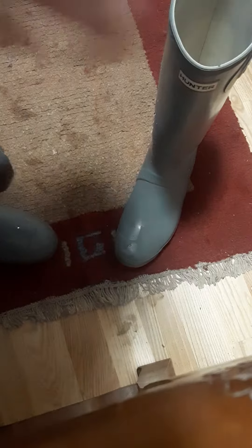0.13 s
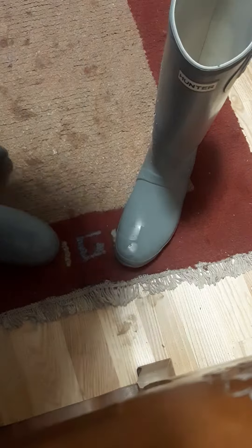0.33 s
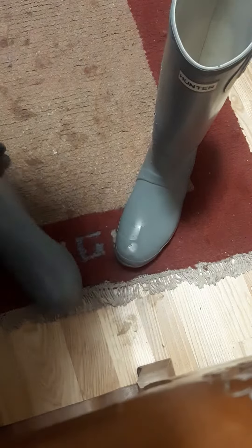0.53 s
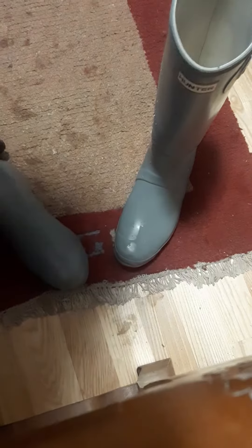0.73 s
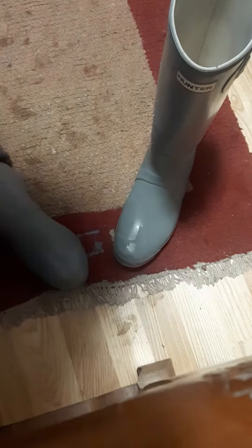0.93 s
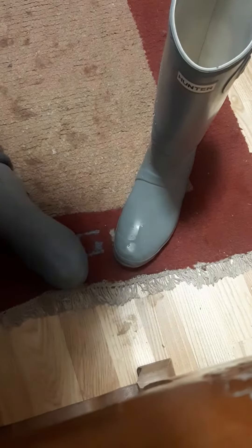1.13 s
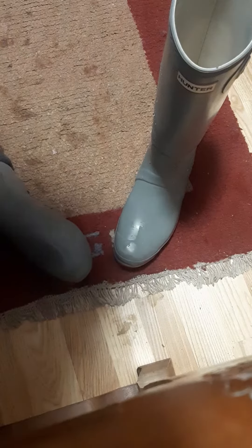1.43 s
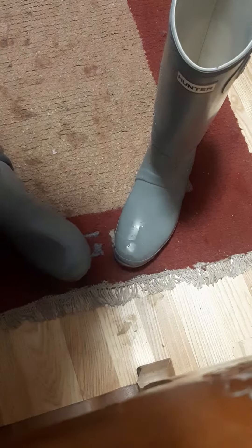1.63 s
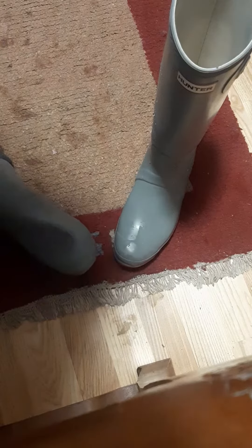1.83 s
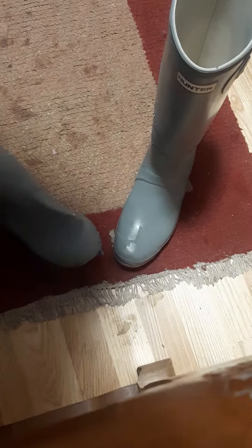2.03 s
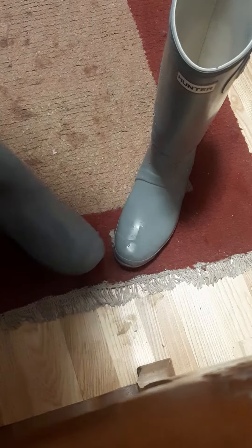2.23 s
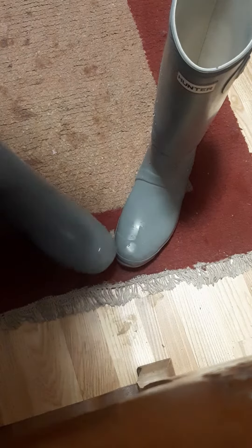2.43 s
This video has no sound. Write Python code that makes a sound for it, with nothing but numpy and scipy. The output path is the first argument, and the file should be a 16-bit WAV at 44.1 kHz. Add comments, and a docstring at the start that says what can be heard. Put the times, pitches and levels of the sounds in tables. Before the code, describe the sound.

Close stereo pickup in a small room of rubber boots being moved: an early hollow rubbery snap, a run of low creaking ticks, two muffled knocks, and fibrous rubbing on the rug towards the end.

```python
"""Rubber boots shift on a rug over a wooden floor in a small room, heard through two microphone ports.
They slide softly as dense tiny slips: hissing rug fibres over a low rub. Rubber scuffs are swelling strokes
of the same friction, and the boot shaft slips from the hand in a squeaky run of impulses that leaves it ringing.
A boot creaks in five slips as it takes weight, and its sole knocks down twice among faint touches:
coloured impulses that ring the floor and return from nearby walls. Quiet room tone lies under it all."""
import sys
import numpy as np
from scipy import signal
from scipy.fft import rfft, irfft
from scipy.io import wavfile
from scipy.ndimage import uniform_filter1d

SR = 44100
rng = np.random.default_rng(int(sys.argv[2]) if len(sys.argv) > 2 else 0)


def store_pcm(level_fs):
    """Save levels as 16-bit WAV."""
    pcm = np.round(np.clip(level_fs, -1, 1) * 32767).astype(np.int16)
    wavfile.write(sys.argv[1], SR, np.atleast_2d(pcm).T)


N = 114660
T = np.arange(N) / SR


def from_db(db):
    """Decibels to gain."""
    return 10 ** (np.asarray(db) / 20)


def rms_one(x):
    """Scale to unit rms."""
    return x / np.sqrt(np.mean(x ** 2) + 1e-20)


def through(x, response):
    """Convolve with an impulse response, channel by channel."""
    return signal.fftconvolve(np.atleast_2d(x), np.atleast_2d(response), axes=1)[:, :N]


def colour(x, points, tilt_db=0, size=4096):
    """Causal (minimum-phase) equaliser through (f/Hz, level/dB) points, tilted in dB per octave about 1 kHz."""
    hz, db = np.transpose(points)
    f = np.maximum(np.arange(size // 2 + 1) * SR / size, 10)
    level_db = np.interp(np.log(f), np.log(hz), db) + tilt_db * np.log2(f / 1000)
    cepstrum = irfft(np.log(from_db(level_db)))
    # folding the cepstrum onto positive time makes the filter causal
    cepstrum[1:size // 2] *= 2
    cepstrum[size // 2 + 1:] = 0
    return through(x, irfft(np.exp(rfft(cepstrum))))


def pan(db):
    """Left and right gains; a positive level difference favours the left port."""
    return from_db([[db / 2], [-db / 2]])


def clicks(rows):
    """One impulse for each (t/s, level/dB) row."""
    out = np.zeros(N)
    for start, db in rows:
        out[int(start * SR)] += from_db(db)
    return out


def ring(x, modes):
    """Excite damped sines of alternating sign, one for each (f/Hz, level/dB, t60/s) row."""
    t = T[:SR]
    response = np.zeros(SR)
    for k, (hz, db, t60) in enumerate(modes):
        decay = from_db(db - 60 * t / t60)
        response += (-1) ** k * decay * np.sin(2 * np.pi * hz * t)
    return through(x, response)


def share_bass(pair):
    """Long waves reach both ports alike; above about 324 Hz the ports drift apart."""
    f = np.arange(N // 2 + 1) * SR / N
    apart = f ** 2 / (f ** 2 + 324 ** 2)
    mid, side = rfft(pair)
    return irfft(mid * np.sqrt(1 - apart / 2) + side * np.sqrt(apart / 2) * [[1], [-1]], N)


def friction(per_s, spread_db):
    """Dense tiny slips of random sign and uneven size, at random times."""
    excess = np.minimum(rng.exponential(1, (2, N)), 4)
    sizes = from_db(spread_db * excess) * rng.choice([-1, 1], (2, N))
    return share_bass(sizes * (rng.random((2, N)) < per_s / SR))


def room_tail():
    """Diffuse reverberation: builds up, drops fast, then lingers; even in colour, unit energy."""
    build_s, early_t60_s, late_t60_s, late_db = 0.01, 0.24, 0.34, 2
    build = np.minimum(T / build_s, 1) ** 2
    decay = from_db(-60 * T / early_t60_s) + from_db(late_db - 60 * T / late_t60_s)
    spectrum = rfft(share_bass(rng.standard_normal((2, N))) * build * decay)
    smooth_size = np.sqrt(uniform_filter1d(abs(spectrum) ** 2, size=300, axis=1))
    return irfft(spectrum / smooth_size, N)[:, :SR]


def placed(x, tail, pan_db, room_db):
    """Direct sound, later at the right port, plus reverberation."""
    port_lag_s = 0.00027
    direct = np.array([x, np.interp(T - port_lag_s, T, x)])
    return direct * pan(pan_db) + from_db(room_db) * through(x, tail)


# colour of the quiet room: [f/Hz, relative level/dB]
AIR_COLOUR = [(25, 10.5), (100, 6), (200, -4), (700, -5.5), (1400, -54.5), (2500, -5.5), (4000, -30.5),
              (7000, -2.5), (9000, -42), (15000, -23.5)]


def room_tone():
    """Still air in the room: steady coloured noise with its bass shared by both ports."""
    noise = share_bass(rng.standard_normal((2, N)))
    return from_db(-68.5) * rms_one(colour(noise, AIR_COLOUR))


# boot sliding over the rug: [t/s, hiss level/dB, low rub level/dB]
SLIDE_LEVELS = [(0, -75.5, -69), (.1, -76.5, -73), (.21, -63.5, -72.5), (.295, -67, -46.5), (.36, -65, -59),
                (.46, -67.5, -64), (.55, -70.5, -81), (.615, -65, -89), (.71, -59, -71.5),
                (0.822, -72, -73), (.9, -66, -64.5), (1.2, -69, -68.5), (1.4, -67, -68), (1.58, -68, -71.5),
                (1.86, -61.5, -62.5), (1.948, -56.5, -55.5), (2.05, -56, -56), (2.15, -64, -61.5),
                (2.3, -59, -61.5), (2.59, -55.5, -58)]
# colour of the rug fibres: [f/Hz, relative level/dB]
HISS_COLOUR = [(300, -38), (1200, -10), (2400, -4), (3500, 0), (7000, -2.5), (8800, -9.5), (12000, -6),
               (15500, -13)]
# colour of the low rub: [f/Hz, relative level/dB]
RUB_COLOUR = [(40, -28), (105, -18), (150, -7), (215, -4.5), (290, -3), (380, 0), (520, -0.5), (700, -0.5),
              (1300, -9), (3000, -13.5), (8000, -64.5)]


def slide():
    """Rug fibres hiss under the moving boot, over a low uneven rub."""
    slips_per_s, spread_db, flutter_db = 9000, 1.5, 0.23
    t, hiss_db, rub_db = np.transpose(SLIDE_LEVELS)
    flutter = flutter_db * rms_one(uniform_filter1d(rng.standard_normal(N), size=900))
    hiss = rms_one(colour(friction(slips_per_s, spread_db), HISS_COLOUR))
    rub = rms_one(colour(friction(slips_per_s, spread_db), RUB_COLOUR))
    hiss = hiss * from_db(np.interp(T, t, hiss_db) + flutter / 2)  # the hiss flutters half as much
    rub = rub * from_db(np.interp(T, t, rub_db) + flutter)
    return hiss * pan(6) + rub * pan(5)


# rubber strokes: [start t/s, attack/s, release t60/s, level/dB, treble tilt/(dB per octave),
# squeak level relative to the rubbing/dB]
SCUFF_STROKES = [(.11, 0.105, 0.051, -62.5, -1, 4.5), (0.2114, 0.0073, 0.078, -35, 0, -19),
                 (.226, .015, 0.19, -31, -0.17, -46), (0.681, 0.039, 0.18, -49.5, 1, -11)]
# colour of rubbing rubber: [f/Hz, relative level/dB]
RUBBER_COLOUR = [(50, -13.5), (130, -1), (220, 1.5), (380, -3), (550, 1.5), (800, 0), (1200, -2),
                 (2200, -8), (3500, -5), (5500, -6), (7300, -10), (8800, -20.5), (11000, -19.5),
                 (14000, -20)]
# resonances of the hollow shaft, also set off by its snap: [f/Hz, relative level/dB, t60/s]
SHAFT_RESONANCES = [(215, -59, .3), (317, -56, .28), (445, -53, .36), (535, -54, .34), (592, -52, .32),
                    (848, -55, .2), (1554, -54, .2), (1708, -52, .22), (2052, -54, .22), (2218, -60, .22),
                    (2319, -58, .22), (2648, -56, .22), (2903, -55, .22), (3050, -58, .22)]


def scuffs(tail):
    """Rubber drags in strokes that swell and die, with a hoarse squeak; the hollow shaft rings along."""
    grips_per_s, grip_spread_db = 3500, 1
    squeak_hz, squeak_width_hz = 2410, 980
    edges_hz = [squeak_hz - squeak_width_hz / 2, squeak_hz + squeak_width_hz / 2]
    squeak_band = signal.butter(2, edges_hz, "band", fs=SR, output="sos")
    strokes = np.zeros((2, N))
    for start, attack, release, db, tilt_db, squeak_db in SCUFF_STROKES:
        swell = np.clip((T - start) / attack, 0, 1)
        decay = from_db(-60 * np.maximum(T - start - attack, 0) / release)
        grips = friction(grips_per_s, grip_spread_db)
        rubbing = rms_one(colour(grips, RUBBER_COLOUR, tilt_db))
        squeak = rms_one(signal.sosfilt(squeak_band, grips))
        strokes += from_db(db) * swell * decay * rms_one(rubbing + from_db(squeak_db) * squeak)
    ringing = from_db(0.5) * ring(strokes, SHAFT_RESONANCES)
    return strokes * pan(2) + ringing + from_db(-5.5) * through(strokes, tail)


# slips as the shaft snaps free: [t/s, relative level/dB]
SNAP_SLIPS = [(.2138, -16), (.2156, -40), (.2165, -11), (.2195, -16)]
# colour of the snapping shaft: [f/Hz, relative level/dB]
SNAP_COLOUR = [(50, -35), (150, 4), (350, -53), (600, 11.5), (1000, -9), (1700, -6), (2300, 7.5),
               (3200, 4.5), (6000, -18), (9000, -33), (15000, -41)]


def shaft_snap(tail):
    """A quick squeaky run of slips as the shaft lets go; the last one leaves it ringing."""
    last_slip_s = SNAP_SLIPS[-1][0]
    ringing = ring(clicks([(last_slip_s, 7)]), SHAFT_RESONANCES)[0]
    snap = from_db(-0.5) * colour(clicks(SNAP_SLIPS), SNAP_COLOUR)[0]
    return placed(snap, tail, pan_db=-9.5, room_db=-6) + ringing


def disperse(x, spread_s):
    """Bending waves: travel time (given at 1 kHz) falls with the root of frequency, so treble leads."""
    f = np.arange(N // 2 + 1) * SR / N
    return irfft(rfft(x) * np.exp(-4j * np.pi * spread_s * np.sqrt(1000 * f)), N)


# wooden floor ringing on under slips and knocks: [f/Hz, relative level/dB, t60/s]
FLOOR_RESONANCES = [(107, -34, 0.95), (212.8, -23, 0.42), (246.4, -21.5, 0.25), (279.3, -22, 0.23),
                    (395, -40, 0.38), (535.6, -28, 0.37), (694, -35, 0.38), (830, -28, 0.32)]
# reflections from nearby walls: [left delay/ms, right delay/ms, relative level/dB]
WALL_ECHOES = [(14.3, 13, -7.5), (17.5, 24, -22), (21.93, 56, -12.5), (27.63, 35, -12), (31.04, 78, -19.5)]


def contacts(rows, spectrum, tail, pan_db, room_db, echo_db, floor_db, spread_s):
    """Sharp contacts push the damped boot, set the floor ringing and come back from the walls."""
    hits = -clicks(rows)
    body = disperse(colour(hits, spectrum)[0], spread_s)
    walls = [clicks([(row[side] / 1000, row[2]) for row in WALL_ECHOES]) for side in range(2)]
    echoes = from_db(echo_db) * through(body, walls)
    floor = from_db(floor_db) * ring(hits, FLOOR_RESONANCES)
    # echoes and floor lie nearer the middle than the boot
    return placed(body, tail, pan_db, room_db) + (echoes + floor) * pan(pan_db / 2)


# stick-slip creak: [t/s, relative level/dB]
CREAK_SLIPS = [(.8991, -4.5), (.9313, 2.5), (.9597, 3), (1.0019, 4), (1.0555, 3.5)]
# colour of the creaking boot: [f/Hz, relative level/dB]
CREAK_SPECTRUM = [(50, -23), (120, -1.5), (230, -3.5), (370, -9), (660, -3.5), (1100, -13.5), (1900, -23.5),
                  (2500, -21.5), (3300, -19), (4800, -23), (6700, -20.5), (9000, -35.5), (15000, -45)]


def boot_creak(tail):
    """Stick-slip as the boot takes weight: five separate slips, each smeared by bending waves."""
    return contacts(CREAK_SLIPS, CREAK_SPECTRUM, tail, pan_db=10, room_db=3.5,
                    echo_db=-0.5, floor_db=-33, spread_s=0.000637)


# two sole knocks among a few faint touches: [t/s, relative level/dB]
SOLE_KNOCKS = [(1.452, -17), (1.595, -14.5), (1.611, -12), (1.6312, 14), (1.7122, 15), (2.591, -9)]
# colour of the knocking sole: [f/Hz, relative level/dB]
KNOCK_SPECTRUM = [(50, -36), (110, -24.5), (170, -6.5), (235, -3), (280, 1.5), (380, -7.5), (480, -9),
                  (650, -9.5), (850, -15.5), (1200, -34.5), (1700, -31), (2600, -40.5), (3600, -39),
                  (6500, -44.5), (10000, -55)]


def sole_knocks(tail):
    """The sole strikes down: low damped thuds with little dispersion."""
    return contacts(SOLE_KNOCKS, KNOCK_SPECTRUM, tail, pan_db=7, room_db=-2,
                    echo_db=1, floor_db=-36, spread_s=0.00005)


def scene():
    """All boot sounds over a quiet room tone."""
    tail = room_tail()
    handling = scuffs(tail) + shaft_snap(tail)
    footing = boot_creak(tail) + sole_knocks(tail)
    return room_tone() + slide() + handling + footing


# colour of the right microphone port relative to the left: [f/Hz, level/dB]
RIGHT_PORT_COLOUR = [(60, -2.5), (250, -1.5), (600, -1), (1200, 0.5), (1700, 5.5), (2350, 13), (3000, 5),
                     (4200, 1), (6200, 1.5), (7000, -13.5), (8000, -8.5), (12000, -12), (15500, -4)]


def record(dry):
    """The right port peaks near 2.4 kHz and loses the top; faint hiss, bass roll-off and a steep top cut."""
    ports = np.array([dry[0], colour(dry[1], RIGHT_PORT_COLOUR)[0]])
    ports = ports + from_db(-76.5) * rng.standard_normal((2, N))  # self-noise
    bass_cut = signal.butter(2, 60, "high", fs=SR, output="sos")
    top_cut = signal.cheby2(20, 60, 16300, fs=SR, output="sos")  # 60 dB down from 16.3 kHz
    return signal.sosfilt(top_cut, signal.sosfilt(bass_cut, ports))


dry = scene()
out = record(dry)
store_pcm(out)
```